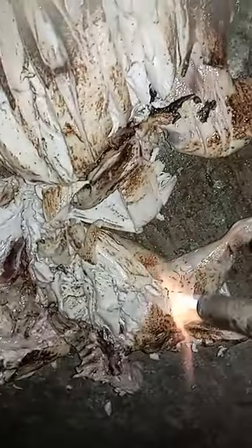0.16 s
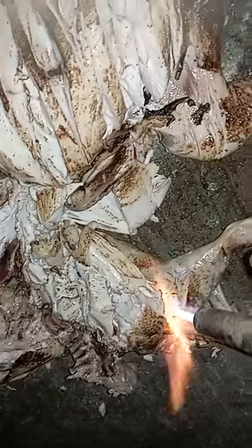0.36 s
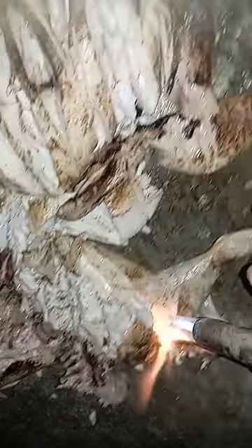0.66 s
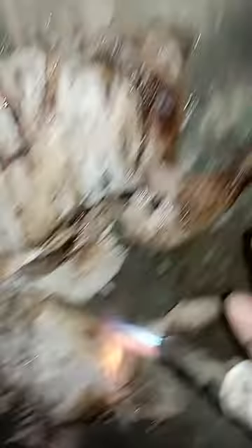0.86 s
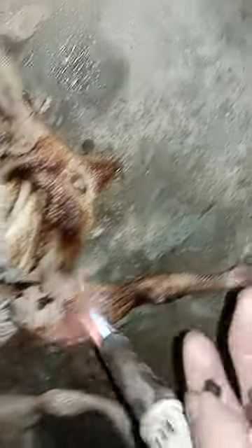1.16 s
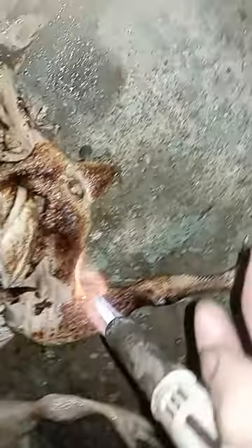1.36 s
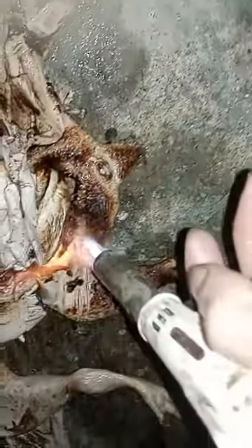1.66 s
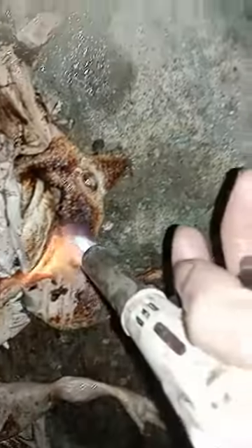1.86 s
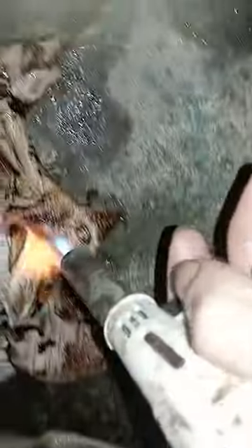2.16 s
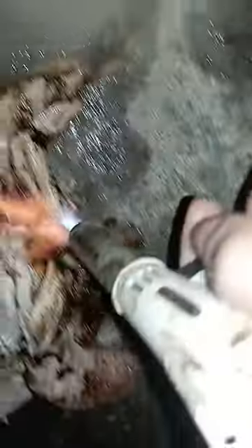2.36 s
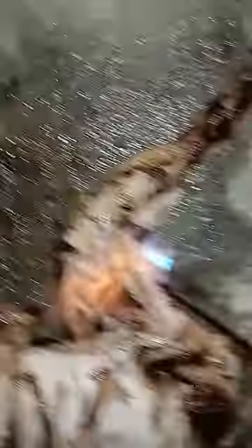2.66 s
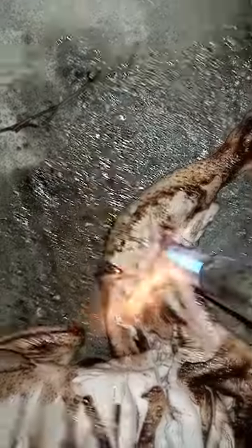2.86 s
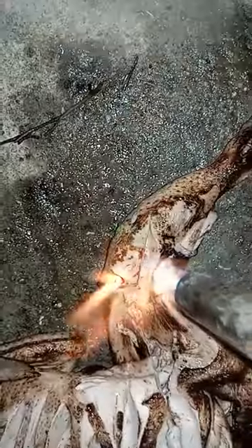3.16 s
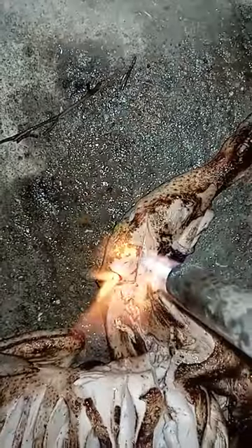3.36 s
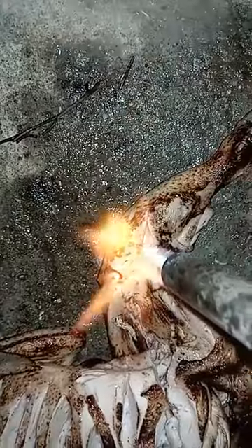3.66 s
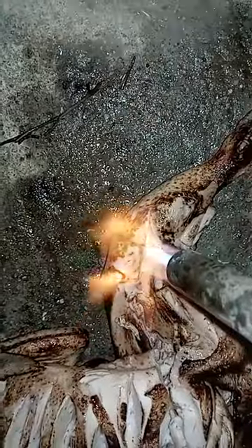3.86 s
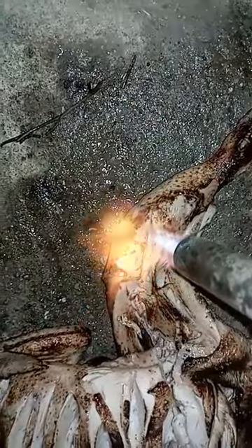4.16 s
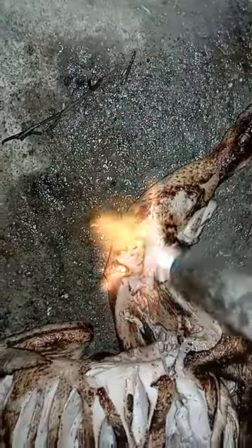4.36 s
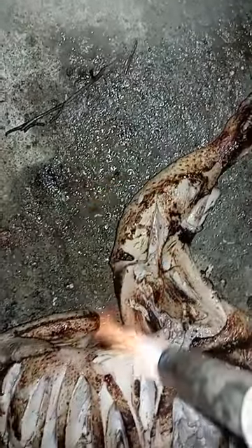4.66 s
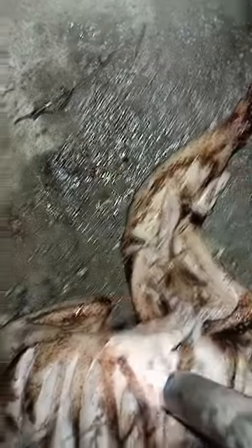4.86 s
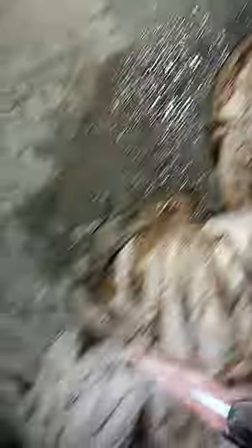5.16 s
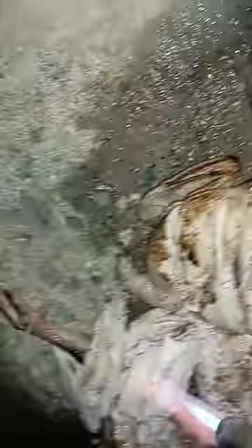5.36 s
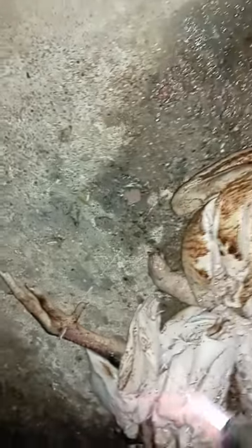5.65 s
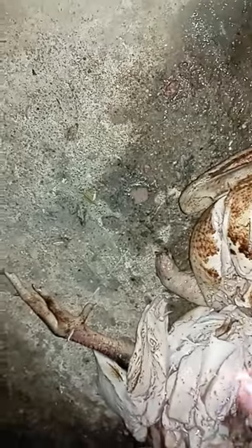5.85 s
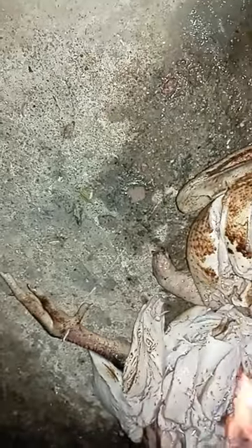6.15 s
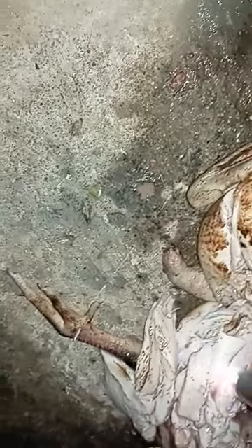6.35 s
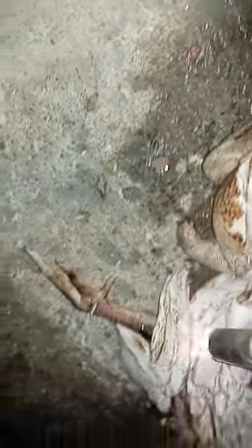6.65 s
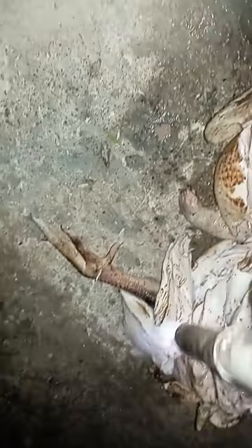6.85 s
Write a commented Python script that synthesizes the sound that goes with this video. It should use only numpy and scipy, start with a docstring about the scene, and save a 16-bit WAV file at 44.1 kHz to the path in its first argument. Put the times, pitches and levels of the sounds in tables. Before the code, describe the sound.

Close rushing torch flame with a bright nozzle hiss, sharp crackles from singed poultry skin, faint squeaks and far splashy bursts in a yard.

```python
"""A hand-held gas torch singes poultry skin on a concrete yard floor, close to a moving pair of microphone ports.
The flame is low noise and the nozzle hisses; short delayed copies at each port shift as the hands move.
Fat spits as single bright pops, with dense sizzle and fizz of random clicks and narrow whistly noise bands.
From farther off come splashy bursts, made of decaying noise with a knock and ringing, and thin tonal squeaks."""
import sys
import numpy as np
from scipy import signal
from scipy.fft import rfft, irfft, next_fast_len
from scipy.io import wavfile

SR = 44100
rng = np.random.default_rng(int(sys.argv[2]) if len(sys.argv) > 2 else 0)


def unload_audio(sound):
    """Save the sound as a 16-bit wav file, at the path given as the first command line argument."""
    columns = np.transpose(np.atleast_2d(sound))
    # keep every value between -1 and 1, then stretch to whole-number steps
    steps = np.round(np.clip(columns, -1, 1) * 32767)
    wavfile.write(sys.argv[1], SR, steps.astype(np.int16))


N = 308259
TIME = np.arange(N) / SR
LEFT_RIGHT = np.array([[1], [-1]])  # signs that share a left-right difference between the ports

# Far splashy bursts: t/s, level/dB, rise constant/s, splash t60/s, knock f/Hz, knock level/dB,
# bright core level/dB, ringing level/dB
BURSTS = [(2.063, -30, 0.0055, 0.52, 738, -31.5, -55, -39), (2.306, -48, 0.008, 0.9, 740, -35, -63, -56),
          (5.585, -27.5, 0.0075, 0.53, 648, -30.5, -29.5, -38)]
# Spectrum of the splash: f/Hz, relative level/dB per Hz
BURST_COLOUR = [(350, -34), (520, -2), (700, 5), (950, 3), (1400, -1), (2000, -1), (3200, -4), (4500, -0.5),
                (7000, -2.5), (10000, -3), (13000, -13), (16000, -38)]
# What the bursts set ringing: f/Hz, relative level/dB, t60/s
BURST_RINGS = [(1470, -3.5, 0.22), (2350, -5.5, 0.33), (2550, -5.5, 0.35), (2805, -7, 0.3), (3080, -4, 0.4),
               (3605, -3, .4), (4000, -7.5, 0.4), (4700, -13, .3), (5630, -7.5, 0.39), (6310, -7, 0.59)]
CORE_HZ, RING_T60_S = 3280, 0.34  # bright core of each burst
RING_WIDTH_HZ, KNOCK_WIDTH_HZ = 48, 140  # the knock band reaches this far to either side
KNOCK_HOLD_S, KNOCK_T60_S = 0.028, 0.15
CLATTER_PER_S, CLATTER_SHARE = 1500, 0.42  # separate droplets or grit within a burst

# Thin squeaks from afar: t/s, length/s, f/Hz, level/dB
SQUEAKS = [(1.853, .05, 2610, -49), (1.908, .025, 2620, -51.5), (1.953, .056, 2600, -46.5),
           (2.011, .02, 2620, -52), (5.478, .036, 2040, -53), (5.512, .022, 3000, -52)]

# Narrow whistly bands in the hiss: t/s, length/s, f/Hz, width/Hz, level/dB, left-right/dB
WHISTLES = [(0.0, 0.92, 8700, 200, -59.5, -8), (0.044, 0.57, 7300, 200, -61, -8),
            (1.201, 0.28, 7600, 250, -64, -8), (1.58, 0.55, 9830, 300, -59, -8),
            (1.622, 0.36, 7600, 300, -62, 4), (2.65, .6, 7600, 250, -58, -8),
            (4.331, 0.15, 8750, 500, -57, -8), (6.203, .45, 7570, 300, -59, 4),
            (6.75, .24, 8050, 400, -59.5, 1), (5.804, .7, 11800, 500, -70, -6),
            (2.305, 0.14, 6860, 200, -52, 3), (2.553, 0.11, 6870, 250, -50, 2),
            (2.592, 0.73, 5040, 500, -54, 2), (2.842, 0.55, 8650, 300, -61, -13),
            (4.646, 0.52, 8000, 400, -57, -2), (5.425, .45, 2970, 300, -53.5, 2),
            (5.854, 1.05, 4600, 302, -59, 6), (6.115, 0.2, 9100, 500, -60, -8)]

# Fine fizz at the very top of the range: t/s, level/dB
FIZZ = [(0.0, -50), (0.6, -56), (1.17, -71), (2.1, -64), (2.51, -66), (3.0, -69), (4.48, -48), (5.24, -67),
        (5.57, -68), (5.61, -52), (5.72, -71), (6.25, -62), (6.39, -71), (6.99, -61)]
FIZZ_PER_S = 450  # before its random drift

# Loudest pops of spitting fat: t/s, peak level/dB, left-right/dB, depth level/dB, top edge level/dB
CRACKS = [(0.06, -21, 0, -22, -8), (0.1148, -23, -7, -13, -7), (0.1642, -21, -8, -25, -5),
          (0.1948, -18, -7, -23, -5), (0.2342, -27, -3, -25, -2), (0.2995, -12.5, 2, -2, -1),
          (0.3793, -34, 0, -20, -6), (0.489, -24, -3, -14, -4), (0.5185, -33, 0, -20, -6),
          (0.571, -27, 0, -18, -5), (0.6123, -28, 0, -20, -4), (0.674, -27, 0, -14, -8),
          (0.9136, -28, -5, -22, -6), (1.06, -35, 0, -20, -8), (3.2625, -32, -3, -18, -6),
          (3.519, -35, -3, -18, -6), (3.884, -30, -3, -18, -6), (3.986, -29, -3, -18, -6),
          (4.0073, -31, -3, -18, -6), (4.339, -24, -7, -20, -7), (6.1684, -36, 0, -16, -8),
          (0.391, -29, 4, -17, -8), (0.4, -20.5, 1, -5, -8), (0.4686, -19, 0, -22, -6),
          (0.4817, -24, -7, -20, -8), (0.5777, -16, 3, -13, -6), (0.598, -26, 1, -23, -5),
          (0.6323, -19, 5, -21, -8), (0.712, -28, 0, -30, -8), (0.759, -23, 6, -17, -10),
          (0.78, -24, -2, -17, -10), (0.8287, -29, -6, -15, -6), (0.865, -27, -5, -20, -10),
          (1.6995, -30, 3, -18, -8), (1.8372, -26, -5, -15, -10), (3.0335, -32, -1, -17, -8),
          (3.207, -21, -3, -17, -8), (3.4194, -25, -2, -18, -8), (3.6673, -13, -5, -14, 4),
          (3.864, -31, -6, -15, -8), (3.933, -26, -6, -17, -8), (3.965, -28, -3, -13, -10),
          (4.038, -27, -5, -15, -8), (4.057, -32, -5, -15, -8), (4.0803, -26, -7, -15, -10),
          (4.103, -28, -4, -16, -10), (4.1305, -27, -5, -12, -8), (4.135, -28, -5, -15, -8),
          (4.1414, -19.5, -14, -15, -4), (4.2176, -25, -11, -10, -4), (4.2263, -28, -6, -18, -5),
          (4.2458, -28, -3, -15, -8), (4.3128, -25, -8, -18, -3), (4.531, -27, 3, -15, -8),
          (4.538, -26, 2, -15, -8), (4.544, -23, -2, -11, -6), (4.6982, -22.5, 4, -8, -10),
          (4.8826, -32, 1.5, -12, -4), (6.1052, -28, 5, -10, -14), (6.1185, -25, 2.5, -14, -10),
          (6.2018, -34, 1, -14, -6), (6.2194, -28, -6, -14, -1), (6.2536, -28, 3.5, -12, -8),
          (6.2817, -29, 5, -12, -6), (6.335, -36, 10, -14, -10)]
# Slaps of a pop off carcass and floor: delay/ms, strength
CRACK_ECHOES = [(1.3, .2), (2.6, .3), (4.0, .15)]
CRACK_HZ = 7930  # sets the main band of a pop

# Gas jet: t/s, hiss level/dB
JET = [(0.0, -43.5), (0.15, -46), (0.4, -42), (0.62, -41.5), (0.88, -43), (1.03, -46), (1.5, -48),
       (1.75, -45), (2.16, -42.5), (2.45, -47), (2.75, -46), (3.1, -42.5), (3.5, -44), (4.28, -43.5),
       (4.85, -42.5), (5.15, -45.5), (5.9, -48), (6.3, -46.5), (6.99, -48)]
# Spectrum of the hiss: f/Hz, relative level/dB per Hz
HISS = [(1000, -26), (1800, 4), (2200, 0.5), (2650, -4), (3100, -2), (4000, -0.5), (8000, 2.5), (16000, 3)]
SPITS_PER_S = 280  # sizzle in the hiss, before it drifts and follows the jet

# Flame: t/s, roar level/dB, brightness of its upper part/dB
FLAME = [(0.0, -37, 1.5), (0.49, -34, -7.5), (0.89, -36, 1), (1.34, -35, -1.5), (1.95, -38, 5),
         (2.16, -33.5, -1), (2.49, -35, 2), (3.13, -31.5, -4.5), (4.57, -31.5, -6), (5.24, -37, 2),
         (5.68, -35.5, -13.5), (6.35, -37, 0), (6.56, -34.5, -0.5), (6.99, -39.5, -9)]
# Spectrum of the roar: f/Hz, relative level/dB per Hz
ROAR = [(25, -63), (45, -27), (80, -16.5), (140, -1), (220, 2), (400, -2), (650, -8), (1000, -16),
        (1700, -20), (2600, -35), (4000, -40.5)]
SCATTER_DB, DIFFUSE_DB = -8, -24  # diffuse arrival of the upper roar and of the whole roar

# Six postures of the hands, with glides between: reached t/s, left t/s, arrival at left port relative
# to right/ms, hiss left-right/dB, extra treble left/dB, extra treble right/dB
POSTURES = [(0.0, 0.848, -0.21, 0.5, 3, -2.5), (1.163, 2.098, -0.25, 1.5, 1.5, -12),
            (2.355, 2.56, -0.231, 4, 1.5, 3), (3.025, 4.6, -0.23, 1, 2, 3),
            (4.948, 5.333, -0.294, 4, -13, -25), (5.8, 7.012, -0.246, 2.5, 2, -13)]
# Echoes off floor, carcass and hand, one row per posture: delay/ms and signed strength for three paths
ECHOES_LEFT = [(0.52, -0.031, 1.44, 0.31, 3, -0.11), (1.3, -0.0019, 2.01, 0.1, 2.66, -0.4),
               (1.77, 0.37, 2.48, -0.56, 3.1, 0.32), (1.72, 0.4, 2.31, -0.64, 3.0, 0.4),
               (1.51, 0.17, 2.36, -0.24, 2.4, -0.081), (0.74, 0.11, 2.58, -0.48, 3.09, 0.37)]
ECHOES_RIGHT = [(1.11, 0.28, 1.2, 0.087, 2.8, -0.35), (0.55, 0.3, 1.16, -0.24, 2.05, -0.53),
                (0.56, 0.38, 1.76, -0.51, 2.68, 0.28), (0.807, 0.2, 1.8, -0.54, 2.5, 0.35),
                (0.84, 0.32, 2.005, -0.53, 2.9, 0.36), (0.93, 0.53, 1.72, -0.61, 3.49, 0.22)]
# One value per posture: gain/dB of the roar below 150 Hz
DEEP_DB = [-3, 0, 0.5, -0.5, 1.5, 0]
# One value per posture: gain/dB of the hiss between 2 and 3 kHz
HOLLOW_DB = [-5.5, 4, 5, -1.5, 1.5, 0.5]
# One value per posture: gain/dB of the hiss around 14 to 15 kHz
AIRY_DB = [2, -1, -2, 1, -2, -3]
ECHO_CUT_HZ = 6000  # dulling of the roar's echoes
TREMOR_MS, TREMOR_PER_S = 0.04, 2  # the hands never hold quite still

# Cavity resonance of each microphone port: f/Hz, level/dB
PORT_LEFT = [(2000, -0.5), (3000, 2), (4000, -0.5), (4800, 0), (6200, 0), (6900, 3.5), (7350, 6),
             (7700, 12), (8100, 8), (8700, -0.5), (9300, -6.5), (10000, -2.5), (10700, -6), (11800, -5.5),
             (13000, -14.5), (16000, -11)]
PORT_RIGHT = [(2000, -1.5), (3000, 2.5), (3800, 0), (4700, -1.5), (5600, -1), (6800, 2), (7600, 4.5),
              (8800, 7.5), (9500, 4.5), (10000, 8), (10500, -0.5), (11800, 0.5), (13000, -4), (15000, -5.5),
              (16000, -8)]
CUTOFF_HZ = 15800


def amp(db):
    """Turn dB into gain."""
    return 10 ** (np.asarray(db) / 20)


def unit(x):
    """Scale to rms 1."""
    return x / np.sqrt(np.mean(x ** 2) + 1e-20)


def in_time(rows):
    """Read each column of a curve table, sample by sample."""
    s, *columns = np.transpose(rows)
    return [np.interp(TIME, s, c) for c in columns]


def by_posture(rows):
    """Hold one row while each posture lasts and join the rows by straight glides."""
    held = []
    for (reached, left, *_), row in zip(POSTURES, rows):
        held += [(reached, *row), (left, *row)]
    return in_time(held)


def at_hz(points, hz):
    """Read a spectrum in dB on a log-frequency axis."""
    points = np.array(points)
    return np.interp(np.log(hz), np.log(points[:, 0]), points[:, 1])


def coloured(x, points):
    """Give steady noise a spectrum."""
    size = next_fast_len(N)
    hz = np.maximum(np.arange(size // 2 + 1) * SR / size, 1)
    return irfft(rfft(x, size) * amp(at_hz(points, hz)), size)[..., :N]


def causal(x, points):
    """Give a sound a spectrum with the least delay, so that nothing rings ahead of a click."""
    size = 2 * next_fast_len(N // 2 + 2000)
    hz = np.maximum(np.arange(size // 2 + 1) * SR / size, 1)
    # folding the cepstrum onto positive times gives minimum phase
    cepstrum = irfft(np.log(amp(at_hz(points, hz))), size)
    cepstrum[1:size // 2] *= 2
    cepstrum[size // 2 + 1:] = 0
    return irfft(rfft(x, size) * np.exp(rfft(cepstrum)), size)[:N]


def drift(rate_hz):
    """Slow random wander of rms 1, smoothed by two equal poles and computed every 40 samples."""
    r = np.exp(-80 * np.pi * rate_hz / SR)
    white = rng.standard_normal(N // 40 + 2002)
    slow = signal.lfilter([1], [1, -2 * r, r * r], white)[2000:]
    return np.interp(np.arange(N) / 40, np.arange(len(slow)), unit(slow))


def band(x, low_hz, high_hz):
    """Gentle band-pass."""
    sos = signal.butter(2, [low_hz, min(high_hz, 0.45 * SR)], "band", fs=SR, output="sos")
    return signal.sosfilt(sos, x)


def first_order(x, hz, kind="low"):
    """Keep what lies below or above a soft edge."""
    return signal.sosfilt(signal.butter(1, hz, kind, fs=SR, output="sos"), x)


def raised(x, part, gain_db):
    """Change the level of one part within a sound."""
    return x + (amp(gain_db) - 1) * part


def late(x, ms):
    """Read a signal late by a time that may change."""
    return np.interp(np.arange(N) - ms * SR / 1000, np.arange(N), x)


def at_ports(x, cut_hz, strength):
    """Direct sound plus three dulled echoes at each port; their interference cuts moving notches."""
    r = np.exp(-2 * np.pi * cut_hz / SR)
    arrival_ms = by_posture(POSTURES)[2]
    ports = []
    for echoes, direct in ((ECHOES_LEFT, x), (ECHOES_RIGHT, late(x, -arrival_ms))):
        paths = by_posture(echoes)
        dull = signal.lfilter([1 - r], [1, -r], direct)
        port = direct
        for ms, gain in zip(paths[::2], paths[1::2]):
            port = port + strength * gain * late(dull, ms + TREMOR_MS * drift(TREMOR_PER_S))
        ports.append(port)
    return np.array(ports)


def around_hand(x):
    """Very short paths round the holding hand wander slowly and comb the treble into drifting bands."""
    ports = []
    for direct in x:
        port = direct
        for ms in (0.21, 0.37, 0.62):
            port = port + 0.087 * late(direct, ms * (1 + 0.063 * drift(0.44)))
        ports.append(port)
    return np.array(ports)


def bursts():
    """Far diffuse noise swells fast and dies, treble first, with knock, bright core, rings and yard tail."""
    white = rng.standard_normal((4, N))
    sizes = amp(4.5 * np.minimum(rng.exponential(1, N), 4)) * (rng.random(N) < CLATTER_PER_S / SR)
    # each droplet or grain sounds about a millisecond
    grain = unit(signal.lfilter([1], [1, -np.exp(-1 / (0.0012 * SR))], sizes))
    white = white * (1 - CLATTER_SHARE + CLATTER_SHARE * grain)

    noise = unit(coloured(white[:2], BURST_COLOUR))
    low = first_order(noise, 5000)
    wobble = 0.022 * drift(42.0)
    core = unit(band(white[2:], 0.94 * CORE_HZ, 1.38 * CORE_HZ))
    half_width = RING_WIDTH_HZ / 2
    tones = [unit(band(white[2:], hz - half_width, hz + half_width)) for hz, *_ in BURST_RINGS]

    out = 0
    for s, level_db, rise, t60, knock_hz, knock_db, core_db, ring_db in BURSTS:
        t = np.maximum(TIME - s, 0)
        swell = (1 - np.exp(-t / rise)) ** 2
        tail = 0.042 * amp(-60 * t / 1.0)
        splash = low * (amp(-60 * t / t60) + tail)
        splash = splash + (noise - low) * amp(-60 * t / (0.66 * t60))

        knock = np.sin(2 * np.pi * knock_hz * np.cumsum(1 + wobble) / SR)
        rough = band(white[0], knock_hz - KNOCK_WIDTH_HZ, knock_hz + KNOCK_WIDTH_HZ)
        knock = knock + 0.35 * unit(rough)
        knock_fade_db = -60 * np.maximum(t - KNOCK_HOLD_S, 0) / KNOCK_T60_S
        rings = amp(knock_db + knock_fade_db) * knock
        rings = rings + amp(core_db - 60 * t / RING_T60_S) * core
        for (_, db, ring_t60), tone in zip(BURST_RINGS, tones):
            rings = rings + amp(ring_db + db - 60 * t / ring_t60) * tone
        out = out + swell * (amp(level_db) * splash + rings)
    return out


def squeaks():
    """Thin far tones with a slight waver in pitch and level, briefly on, out of phase between the ports."""
    out = np.zeros((2, N))
    waver, shake_db = 0.004 * drift(50), 2 * drift(80)
    for s, length, hz, level_db in SQUEAKS:
        i, size = round(s * SR), round(length * SR)
        phase = 2 * np.pi * np.cumsum(hz * (1 + waver[i:i + size])) / SR
        shape = amp(level_db + shake_db[i:i + size]) * np.hanning(size) ** 0.3
        out[:, i:i + size] += shape * np.sin(phase + np.array([[0], [1.5]]))
    return out


def whistles():
    """Noise in narrow bands that fades in and out."""
    out = np.zeros((2, N))
    for s, length, hz, width_hz, level_db, pan_db in WHISTLES:
        i, size = round(s * SR), round(length * SR)
        white = rng.standard_normal((2, 3 * SR))
        noise = band(white, hz - width_hz / 2, hz + width_hz / 2)
        noise = unit(noise[:, -size:])  # the settled end of the filtered noise
        gain = amp(level_db + pan_db / 2 * LEFT_RIGHT)
        out[:, i:i + size] += gain * np.hanning(size) ** 0.5 * noise
    return out


def fizz():
    """Tiny spits of fat, dense and very bright, drawn separately for each port."""
    level_db, = in_time(FIZZ)
    sizes = amp(5.3 * np.minimum(rng.exponential(1, (2, N)), 4)) * rng.choice([-1, 1], (2, N))
    spits = sizes * (rng.random((2, N)) < FIZZ_PER_S * amp(5 * drift(10)) / SR)
    return amp(level_db) * unit(band(spits, 11600, 18000))


def cracks():
    """Each fat pop is a snap at both ports and a few ms of scattered noise; deep ones reach below 1 kHz."""
    out, t = np.zeros((2, N)), TIME[:1200]
    lead = 11  # samples by which the left port hears it first
    for s, peak_db, pan_db, depth_db, edge_db in CRACKS:
        white = rng.standard_normal((3, len(t)))
        puff = white[0] * np.exp(-t / 0.0005) + 0.17 * white[1:] * np.exp(-t / 0.004)
        puff = puff * (1 - np.exp(-t / 0.0003))
        puff = puff + 2.4 * (np.arange(len(t)) == lead)  # the snap itself
        puff = puff + sum(g * np.roll(puff, round(ms * SR / 1000), axis=1) for ms, g in CRACK_ECHOES)

        main = unit(band(puff, 0.7 * CRACK_HZ, 1.85 * CRACK_HZ))
        depth = unit(band(puff, 470, 8300))
        edge = unit(band(puff, 12500, 19200))
        pop = main + amp(depth_db) * depth + amp(edge_db) * edge
        pop *= amp(peak_db + pan_db / 2 * LEFT_RIGHT) / np.abs(pop).max(axis=1, keepdims=True)
        i = round(s * SR)
        out[0, i - lead:i - lead + len(t)] += pop[0]
        out[1, i:i + len(t)] += pop[1]
    return out


def jet():
    """Nozzle hiss and fine sizzle, part direct with echoes, part scattered; hand and torch shade the treble."""
    level_db, = in_time(JET)
    pan_db, left_db, right_db = by_posture(POSTURES)[3:]
    white = rng.standard_normal((3, N))
    sizes = amp(3.0 * np.minimum(rng.exponential(1, N), 3.5)) * rng.choice([-1, 1], N)
    # spits come in flurries and thicken as the jet gets louder
    spits_per_s = SPITS_PER_S * amp(3.5 * drift(12) + 1.1 * (level_db - level_db.mean()))
    sizzle = 2.9 * sizes * (rng.random(N) < spits_per_s / SR)

    direct = at_ports(white[0] + sizzle, 12000, strength=1.6)
    wide = unit(coloured(direct + 1.15 * white[1:], HISS))
    treble = coloured(wide, [(7800, -16.5), (8600, -6.0), (10000, -7)])
    shaded = raised(wide, treble, np.array([left_db, right_db]))
    shaded = raised(shaded, band(wide, 1980, 3000), by_posture(np.c_[HOLLOW_DB])[0])
    shaded = raised(shaded, band(shaded, 14200, 15000), by_posture(np.c_[AIRY_DB])[0])
    flutter_db = 1.4 * drift(13.3) + 0.24 * drift(65)
    return amp(level_db + flutter_db + pan_db / 2 * LEFT_RIGHT) * shaded


def roar():
    """Turbulent burning: low noise whose upper part grows when the flame is pressed onto the skin."""
    level_db, bright_db = in_time(FLAME)
    white = rng.standard_normal((3, N))
    near = unit(coloured(white[0], ROAR))
    scattered = unit(coloured(white[1:], ROAR))
    sound = at_ports(near, ECHO_CUT_HZ, strength=1)
    sound = sound + amp(SCATTER_DB) * band(scattered, 1300, 6000) + amp(DIFFUSE_DB) * scattered
    sound = raised(sound, first_order(sound, 150), by_posture(np.c_[DEEP_DB])[0])
    sound = raised(sound, first_order(sound, 700, "high"), bright_db)
    return amp(level_db + 1.0 * drift(13.0)) * sound


def scene():
    """Sum at the two ports, from the far yard to the torch."""
    return bursts() + squeaks() + whistles() + fizz() + cracks() + around_hand(jet()) + roar()


def record(dry):
    """Each microphone port colours the treble with its cavity; a steep low-pass cuts the top."""
    ports = np.array([causal(dry[0], PORT_LEFT), causal(dry[1], PORT_RIGHT)])
    return signal.sosfilt(signal.ellip(12, 0.5, 70, CUTOFF_HZ, fs=SR, output="sos"), ports)


dry = scene()
out = record(dry)
unload_audio(out)
```